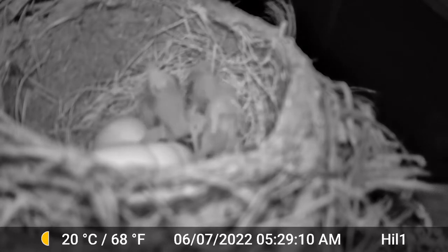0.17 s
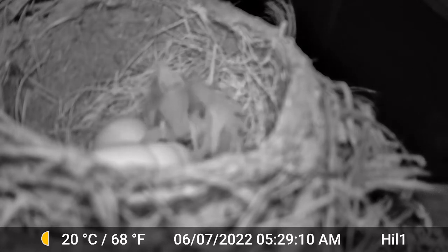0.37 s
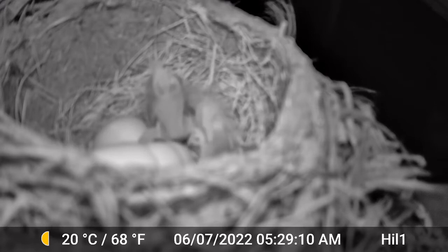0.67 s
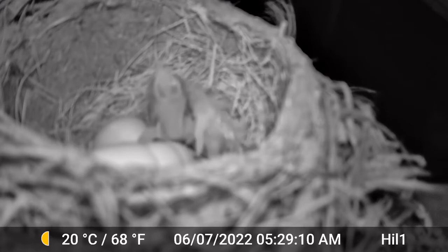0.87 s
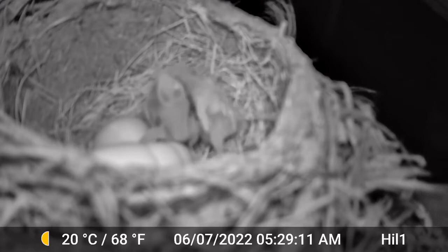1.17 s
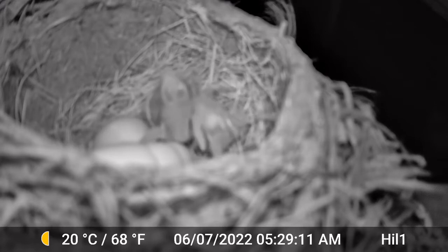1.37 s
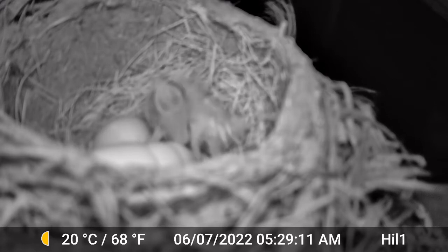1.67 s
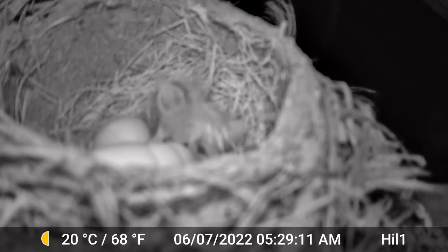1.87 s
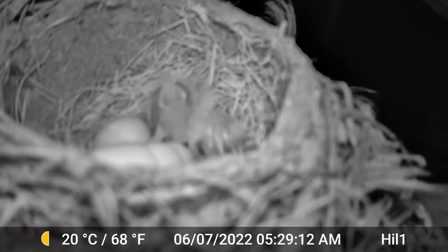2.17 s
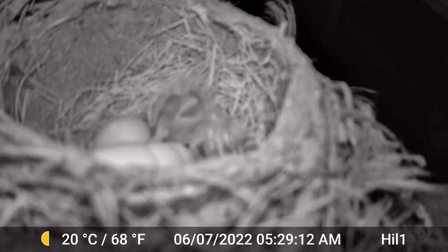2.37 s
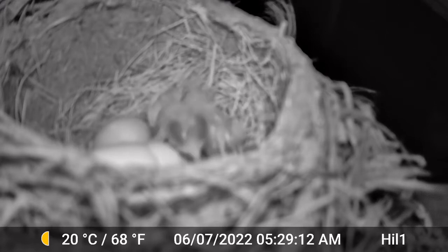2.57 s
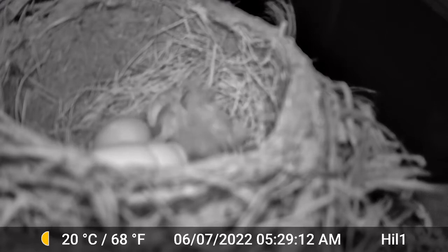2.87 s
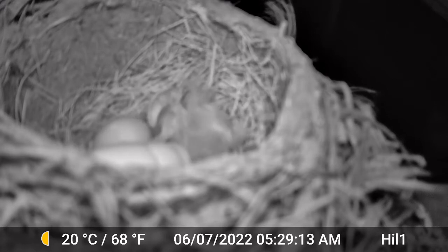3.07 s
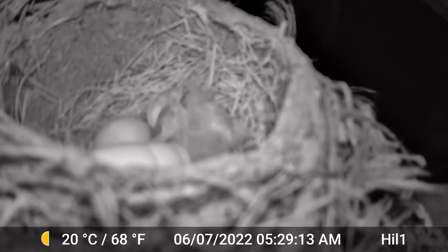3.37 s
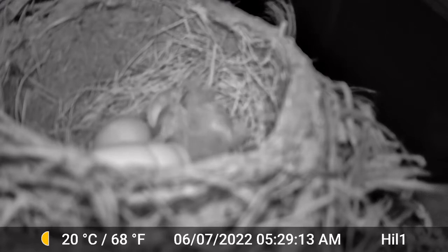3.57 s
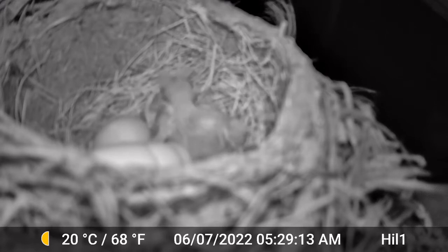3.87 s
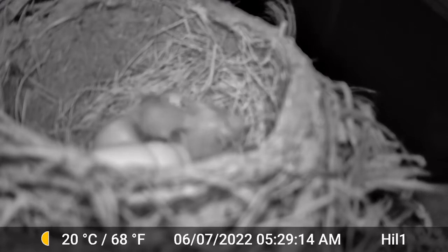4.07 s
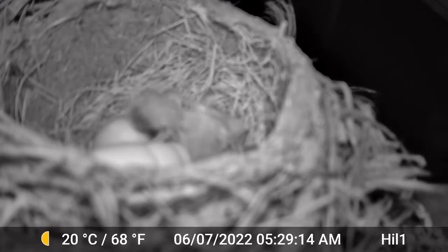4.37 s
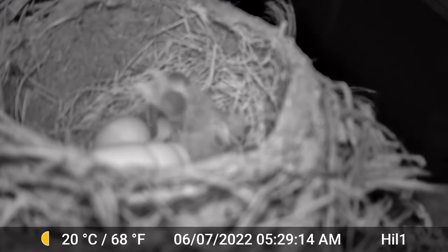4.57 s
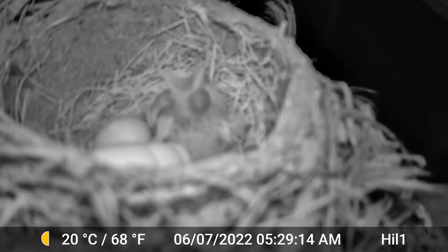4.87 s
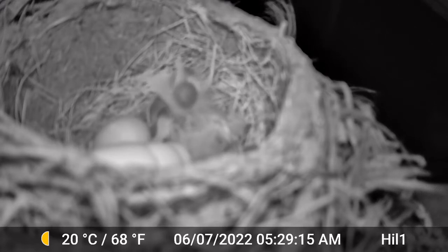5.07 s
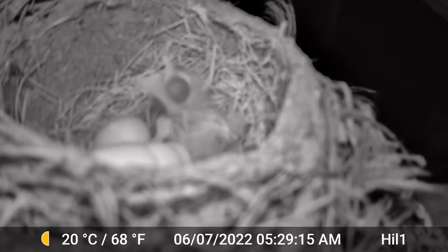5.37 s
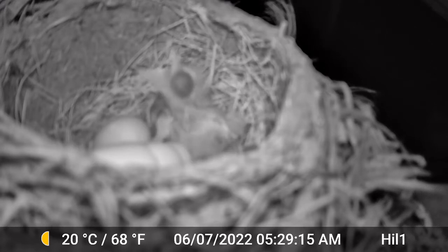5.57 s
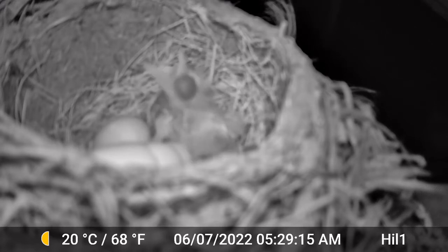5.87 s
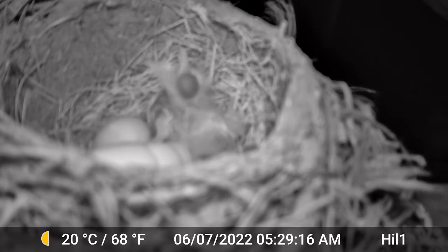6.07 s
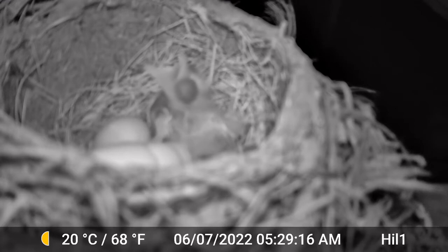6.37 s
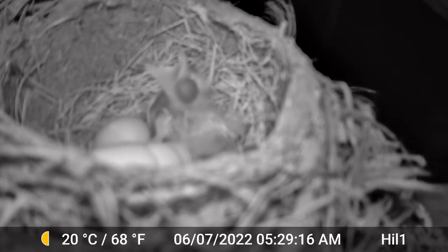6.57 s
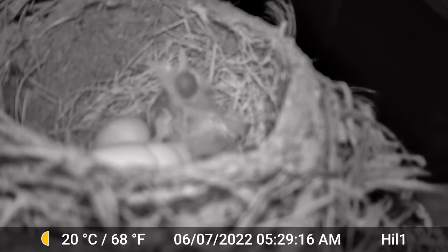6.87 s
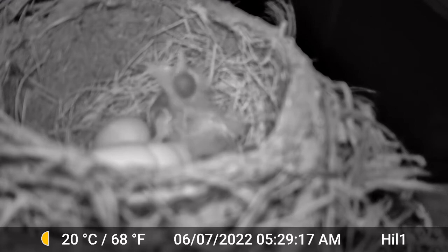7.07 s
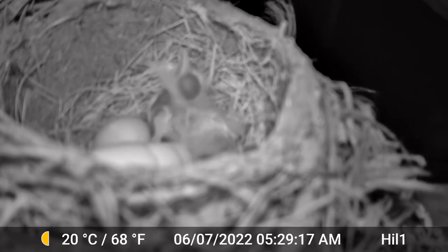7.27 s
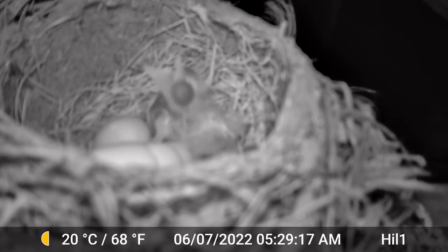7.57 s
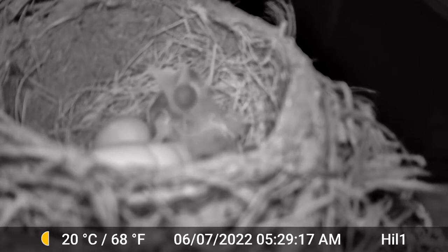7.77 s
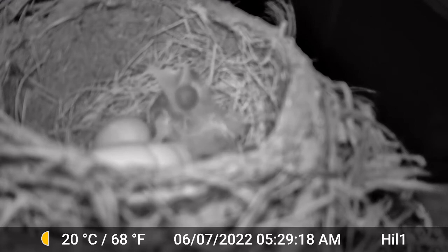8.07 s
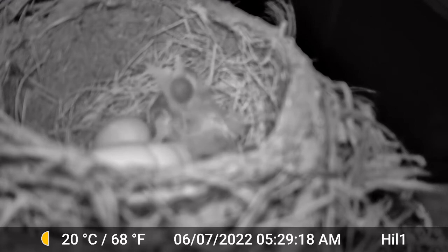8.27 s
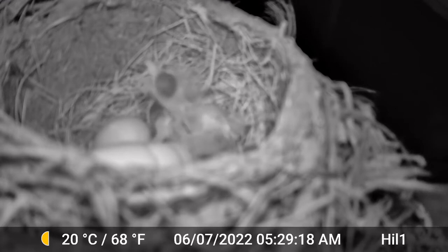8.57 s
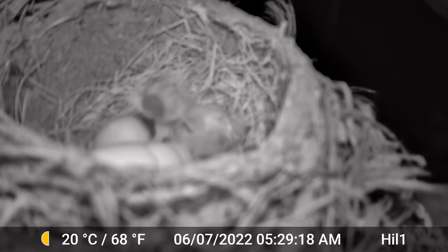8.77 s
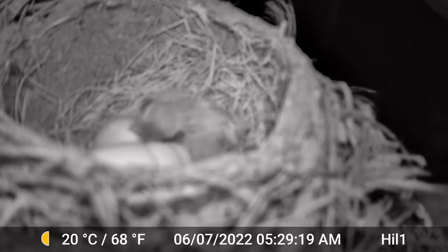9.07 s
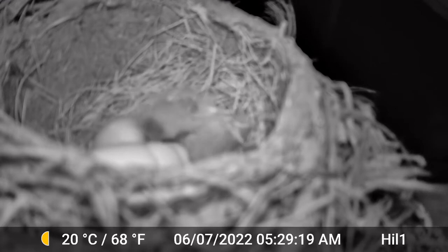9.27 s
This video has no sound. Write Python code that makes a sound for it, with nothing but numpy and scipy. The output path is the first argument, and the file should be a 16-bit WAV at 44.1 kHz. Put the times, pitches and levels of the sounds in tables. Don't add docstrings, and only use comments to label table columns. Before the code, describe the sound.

Dawn at a nest: distant rumbling traffic, faint far-off bird chorus, echoing clear songbird whistles, and a chick's few brief dry peeps close up.

```python
import sys
import numpy as np
from scipy import signal
from scipy.fft import rfft, irfft
from scipy.io import wavfile
from scipy.ndimage import uniform_filter1d, map_coordinates

SR = 44100
rng = np.random.default_rng(int(sys.argv[2]) if len(sys.argv) > 2 else 0)


def materialize(psi):
    bounded = np.clip(np.atleast_2d(psi).T, -1, 1)
    quanta = np.round(bounded * 32767).astype(np.int16)
    wavfile.write(sys.argv[1], SR, quanta)


def voltage_ratio(level):
    return 10 ** (np.asarray(level, float) / 20)


N = 415422


def unit(x):
    return x / np.sqrt(np.mean(x ** 2) + 1e-20)


def along(points, hz):
    f, v = np.transpose(points)
    return np.interp(np.log(hz + 1), np.log(f + 1), v)


def curves(rows):
    s, *cols = np.transpose(rows)
    return [np.interp(np.arange(N) / SR, s, c) for c in cols]


def wobble(rate, n=N):
    knots = rng.standard_normal(int(n * 1000 / SR) + 4)
    return map_coordinates(knots, [np.arange(n) * min(rate, 1000) / SR])


def background():
    # start_s, road_roar_db, chorus_db
    air = [(0.0, -36, -57), (1.84, -36, -60.5), (2.2, -35.5, -60), (4.43, -36, -57), (4.69, -36, -58.5),
           (5.3, -37.5, -61.5), (5.75, -37.5, -62.5), (6.1, -37.5, -57), (6.45, -36, -62.5),
           (6.9, -35.5, -64), (7.4, -35, -57.5), (7.9, -35, -62), (8.4, -35.5, -60.5), (8.8, -35.5, -62),
           (9.42, -34.5, -58)]
    # pitch_hz, level_db (per Hz)
    low = [(18, -40), (30, -19.5), (50, -8.5), (75, -7), (91, 1), (105, -9), (140, -11), (200, -41)]
    road = [(65, -31.5), (110, -5.5), (176, -3), (221, -13.5), (260, -12), (358, -20), (420, -15.5),
            (528, -21.5), (627, -18), (1130, -29.5), (1700, -47), (2210, -73), (3740, -120)]
    bird_blur = [(1500, -37), (2000, -13), (2400, -1), (3000, 0), (3400, -5), (3800, -4.5), (4300, -15),
                 (5500, -35.5)]
    mic_noise = [(900, -28), (1500, 2.5), (4000, -6), (7000, -7), (8000, -16), (8700, -30.5), (9100, -61)]
    roar_db, chorus_db = curves(air)
    unsteady = voltage_ratio(1.3 * wobble(8.3)) * rush(low, patchy_db=0.5, size=4096)
    rumble = voltage_ratio(lumps()) * unit(unsteady)
    roar = voltage_ratio(roar_db + 1.1 * wobble(5)) * rush(road, patchy_db=1.95, size=2048)
    chorus = voltage_ratio(chorus_db) * rush(bird_blur, patchy_db=3, size=1024)
    hiss = voltage_ratio(-67) * rush(mic_noise, patchy_db=.2, size=512)
    return rumble + roar + chorus + hiss


def lumps():
    # middle_s, level_db (over the steady rumble)
    rumble_lumps = [(.05, 8.5), (2.53, 11.5), (4.25, 7.5), (4.4, 11), (4.88, 10.5), (5.41, 4.5),
                    (5.87, 1.5), (6.01, 8), (6.42, 2.5), (6.68, 10.5), (1.03, 8.5), (7.62, 3.5), (8.32, 5),
                    (9.02, 12), (9.21, 7.5)]
    steady_db, half_width_s, lull_db = -33, 0.034, -4.5
    t = np.arange(N) / SR

    def bell(s, width):
        return np.exp(-((t - s) / width) ** 2)

    level = np.full(N, float(steady_db))
    for s, db in rumble_lumps:
        level += (db - lull_db) * bell(s, half_width_s)
        level += lull_db * bell(s, 3 * half_width_s)
    return level


def rush(spectrum, patchy_db, size):
    z = signal.stft(rng.standard_normal(N + 8192), nperseg=size)[2]
    field = uniform_filter1d(rng.standard_normal(z.shape), size=3, axis=0)
    field = uniform_filter1d(field, size=16, axis=1)
    patchy = signal.istft(z * voltage_ratio(patchy_db * unit(field)), nperseg=size)[1]
    x = rfft(patchy)
    hz = np.linspace(0, SR / 2, len(x))
    inside = (hz > spectrum[0][0]) & (hz < spectrum[-1][0])
    return unit(irfft(x * voltage_ratio(along(spectrum, hz)) * inside)[:N])


def straw():
    # start_s, peak_db, ring_hz
    ticks = [(0.1262, -50, 6720), (0.1478, -41, 5590), (1.1998, -44, 7050), (3.5545, -47.5, 5390),
             (4.012, -41, 5700), (4.145, -34, 6030), (4.6794, -56, 4580), (9.1252, -54, 6900)]
    out, t = np.zeros(N + SR), np.arange(SR // 25) / SR
    for s, db, hz in ticks:
        snaps = rng.standard_normal(len(t)) * voltage_ratio(-60 * t / .04)
        swell = voltage_ratio(-60 * t / 0.0039) * (1 - np.exp(-t / .0004))
        ring = np.sin(2 * np.pi * hz * t) * swell
        tick = signal.fftconvolve(snaps, ring)[:len(t)]
        out[round(s * SR):][:len(t)] += voltage_ratio(db) * tick / np.abs(tick).max()
    return out[:N]


def far_birds():
    # start_s, length_s, from_hz, to_hz, level_db
    far_glides = [(.18, 0.2, 3264, 3233, -53), (.46, 0.1, 2750, 2535, -56), (.52, 0.06, 3160, 3100, -61),
                  (.96, 0.16, 3530, 3550, -53.5), (2.2, 0.068, 3300, 3800, -53),
                  (2.32, 0.044, 2990, 3380, -42.5), (2.475, 0.14, 3055, 3430, -47.5),
                  (2.74, 0.077, 2560, 2560, -54), (5.35, 0.18, 2155, 2020, -60.5),
                  (5.42, 0.13, 3195, 3090, -54), (5.53, 0.081, 2330, 2020, -51),
                  (6.04, 0.15, 2900, 2460, -57), (6.5, 0.14, 2526, 2620, -56),
                  (6.572, .07, 3140, 3000, -50), (6.995, 0.19, 3500, 3530, -49),
                  (7.115, 0.043, 2255, 2000, -48), (7.575, 0.053, 2950, 2610, -45),
                  (7.69, 0.11, 2920, 3020, -53), (8.63, 0.083, 2105, 1996, -61), (9.1, .1, 3330, 2980, -49),
                  (9.28, 0.1, 3170, 3640, -59.5),
                  (.33, 0.058, 2390, 2300, -59), (0.408, .05, 2400, 2340, -60),
                    (0.562, 0.099, 3040, 2960, -61), (4.55, .1, 2270, 2160, -59),
                    (7.02, 0.075, 3300, 2900, -55), (7.63, .045, 1960, 1900, -63),
                    (7.75, 0.1, 3440, 3600, -63), (8.608, .12, 3110, 3060, -66),
                    (8.728, 0.074, 2210, 2190, -59.5), (9.18, .06, 2490, 2210, -59),
                    (2.6, 0.038, 3320, 3300, -52.5)]
    # start_s, length_s, edge_hz, turning_hz, level_db
    far_turns = [(2.8, 0.17, 2935, 3210, -47), (4.425, 0.068, 4620, 4690, -54.5),
                 (4.57, 0.086, 4450, 4600, -57), (6.0, .05, 3170, 3610, -57),
                 (6.97, 0.051, 2420, 2260, -58), (7.5, 0.054, 3250, 3580, -50.5),
                 (8.835, 0.093, 2640, 2930, -42), (2.55, 0.078, 2180, 2184, -56),
                 (6.64, 0.082, 3010, 3020, -58), (3.3, 0.17, 3250, 3270, -48.5),
                 (8.72, 0.086, 2660, 2640, -62), (9.04, 0.1, 3400, 3345, -48.5)]
    buzzes = [
        (5.98, .11, 4700, 4250, -63),
        (8.35, .4, 4680, 4390, -74),
    ]
    # time_s, pitch_hz, level_db
    hook = [(8.178, 3500, -60), (8.192, 2810, -44), (8.225, 2390, -42), (8.26, 2280, -50),
            (8.288, 2325, -47), (8.305, 2940, -39)]
    # start_s, length_s, from_hz, to_hz, level_db
    strokes = [
        (8.32, .024, 2300, 2930, -44.5),
        (8.342, .027, 2910, 2950, -50),
        (6.935, 0.037, 3000, 2450, -60),
        (8.965, .035, 3250, 3560, -46),
        (9.0, .03, 3560, 3400, -46.5),
        (9.025, .075, 3350, 2600, -45),
    ]
    far_notes = plain(far_glides) + plain(far_turns, turning=True)
    calls = whistles(far_notes, octave_db=-60, edge_s=.008, waver=.01, flutter_db=4.5)
    calls = calls + whistles([hook, *plain(strokes)], octave_db=-60, edge_s=.008, waver=.006, flutter_db=2.5)
    calls = calls + whistles(plain(buzzes, turning=True), octave_db=-60, edge_s=.02, waver=.04, flutter_db=4)
    return heard(calls, direct_db=-2.5, near_db=-5.5, reach_s=.07, far_db=-10, stretch=.9, treble_db=-3)


def plain(rows, turning=False):
    start_db, end_db, attack, release = -1.5, -7, 0.47, 0.32
    u = np.linspace(0, 1, 9)
    shape = 4 * u * (1 - u) if turning else u
    swell = start_db * np.clip(1 - u / attack, 0, 1)
    swell = swell + end_db * np.clip(1 - (1 - u) / release, 0, 1)
    return [np.transpose([s + length * u, a + (b - a) * shape, db + swell]) for s, length, a, b, db in rows]


def whistles(notes, octave_db, edge_s, waver, flutter_db, rasp=0):
    out = np.zeros(N + SR)
    for note in notes:
        s, hz, db, *own = np.transpose(note)
        t = np.arange(s[0] - edge_s, s[-1] + edge_s, 1 / SR)

        def smooth(v):
            return uniform_filter1d(np.interp(t, s, v), size=220)

        pitch = smooth(hz) * (1 + warble(t) + waver * wobble(150, len(t)))
        phase = 2 * np.pi * np.cumsum(pitch) / SR
        gate = np.clip(np.minimum(t - t[0], t[-1] - t) / (2 * edge_s), 0, 1) ** 2
        flutter = flutter_db * wobble(70, len(t))
        upper_db = smooth(own[0]) if own else smooth(db) + octave_db
        tone = voltage_ratio(smooth(db) + flutter) * np.sin(phase)
        rough_phase = 2 * phase + rasp * wobble(250, len(t))
        octave = voltage_ratio(upper_db + 2.5 * flutter) * np.sin(rough_phase)
        out[round(t[0] * SR):][:len(t)] += np.sqrt(2) * gate * (tone + octave)
    return out[:N]


def warble(t):
    # start_s, end_s, swing (share of the pitch), turns_per_s
    trills = [(0.864, .965, 0.056, 108), (4.15, 4.256, 0.067, 102), (4.42, 4.483, 0.053, 110),
              (4.57, 4.64, 0.052, 82), (2.78, 2.97, 0.065, 55), (8.99, 9.3, 0.029, 130),
              (5.99, 6.17, 0.04, 63), (5.42, 5.49, 0.043, 83)]
    swings = np.zeros(len(t))
    for a, b, swing, rate in trills:
        fade = np.clip(np.minimum(t - a, b - t) / 0.014, 0, 1)
        swings += swing * fade * np.sin(2 * np.pi * rate * (t - a))
    return swings


def heard(x, direct_db, near_db, reach_s, far_db, stretch, treble_db, dull_hz=4500, sent=None):
    sent = x if sent is None else sent
    near = walls(sent, reach_s, fall_db=-13, clump_db=3, dull_hz=dull_hz)
    far = yard(sent, gap_s=.03, stretch=stretch, treble_db=treble_db)
    return voltage_ratio(direct_db) * x + voltage_ratio(near_db) * near + voltage_ratio(far_db) * far


def walls(x, reach_s, fall_db, clump_db, dull_hz):
    t = np.arange(round(0.7 * reach_s * SR)) / SR / reach_s
    clumps = clump_db * wobble(156, SR // 4)[:len(t)]
    ending = np.clip((1.3 - t) / 0.23, 0, 1) * (t > .02)
    echoes = rng.standard_normal(SR // 4)[:len(t)] * voltage_ratio(fall_db * t + clumps) * ending
    dull = signal.butter(2, dull_hz, fs=SR, output="sos")
    echoes = signal.sosfilt(dull, echoes / np.linalg.norm(echoes))
    return signal.oaconvolve(x, echoes)[:N]


def yard(x, gap_s, stretch, treble_db):
    # pitch_hz, fade_s (time to fall 60 dB)
    yard_fade = [(1800, 0.55), (3000, 0.49), (4200, 0.76), (5500, 1), (8000, 0.35)]
    hz, t, z = signal.stft(rng.standard_normal(SR * 3 // 4), SR, nperseg=256)
    fade_s = stretch * along(yard_fade, hz)[:, None]
    tail = signal.istft(z * voltage_ratio(-60 * t / fade_s), SR, nperseg=256)[1]
    tail = tail * voltage_ratio(4 * wobble(35, len(tail)))
    tail = np.pad(tail / np.linalg.norm(tail), (round(gap_s * SR), 0))
    colour = voltage_ratio(along([(4000, 0), (5000, treble_db)], np.fft.rfftfreq(len(tail), 1 / SR)))
    return signal.oaconvolve(x, irfft(rfft(tail) * colour, len(tail)))[:N]


def nestling():
    # time_s, pitch_hz, level_db
    cheep = [(.705, 2590, -62), (.717, 2750, -44.5), (.73, 2760, -40), (.748, 2660, -56), (.768, 2430, -55)]
    # time_s, pitch_hz, tone_db, octave_db
    gape = [(1.708, 2864, -49, -62), (1.718, 3085, -36, -44), (1.734, 3330, -30.5, -36.5),
            (1.748, 3330, -29, -33.5), (1.766, 3050, -30, -35), (1.774, 2880, -30.5, -38.5),
            (1.784, 2475, -40, -34), (1.79, 2330, -47, -46)]
    voice = whistles([cheep, gape] + peeps(), octave_db=0, edge_s=.0016, waver=.001, flutter_db=.5, rasp=.1)
    return heard(voice, direct_db=-.5, near_db=-14, reach_s=.02, far_db=-21, stretch=.7, treble_db=-10,
                 dull_hz=8000)


def peeps():
    # start_s, length_s, top_hz, peak_db, octave_peak_db
    peep_rows = [
        (4.318, 0.06, 3300, -33, -40),
        (5.793, 0.073, 3430, -23, -35.5),
        (7.38, 0.079, 3445, -23, -34),
        (8.823, 0.094, 3436, -22, -34),
    ]
    # share (of the length), tone_db, octave_db (relative to their peaks)
    arch = [(0, -15, -21.5), (.06, -11, -17), (.25, -11.5, -15), (.42, -12.5, -12), (.62, -5.5, -7.5),
            (.83, 0.5, 1), (.93, -5.5, -7), (1, -17, -15)]
    crest, rise, fall, squareness = 0.4, .16, 0.34, 2.5
    u = np.linspace(0, 1, 33)
    share, tone, upper = np.transpose(arch)
    before = rise * np.abs(1 - u / crest) ** squareness
    after = fall * np.abs((u - crest) / (1 - crest)) ** squareness
    bow = 1 - np.where(u < crest, before, after)
    notes = []
    for s, length, top, db, octave_db in peep_rows:
        tone_db = db + np.interp(u, share, tone)
        upper_db = octave_db + np.interp(u, share, upper)
        notes.append(np.transpose([s + u * length, top * bow, tone_db, upper_db]))
    return notes


def songbird():
    echo_db = [-1, 1, -6, -2.5, 0.5, -1.5, -0.5, 2.5, 1.5, -0.5, 1, 0, -6, -0.5, 0.5]
    # start_s, length_s, from_hz, to_hz, level_db
    twitter = [(2.275, .016, 6800, 5300, -39), (2.289, 0.016, 5350, 3430, -34),
               (2.5, .005, 8300, 7300, -52), (2.316, 0.017, 4800, 8700, -43.5),
               (2.343, .016, 9020, 6800, -51.5), (2.356, .008, 7500, 6940, -44.5),
               (2.352, .03, 4450, 3710, -34.5), (2.385, 0.047, 3720, 3750, -48.5),
               (2.383, 0.0079, 6750, 8200, -36.5), (2.403, 0.011, 8500, 7160, -52),
               (2.42, 0.011, 7300, 8400, -48), (2.44, .04, 7600, 7150, -59),
               (2.477, 0.13, 7300, 7560, -50.5), (2.535, .07, 6620, 6700, -61),
               (2.46, .06, 5900, 6450, -66.5), (2.5, 0.13, 8600, 8550, -64.5)]
    notes = syllables()
    song = whistles(notes, octave_db=0, edge_s=.003, waver=.003, flutter_db=1.3, rasp=.95)
    ends_s = np.ravel([note[[0, -1], 0] for note in notes])
    sent_db = curves(np.transpose([ends_s, np.repeat(echo_db, repeats=2)]))[0]
    tune = heard(song, direct_db=-2, near_db=-4.5, reach_s=.19, far_db=-8, stretch=1.2, treble_db=-11,
                 dull_hz=4000, sent=song * voltage_ratio(sent_db))
    high = whistles(plain(twitter), octave_db=-70, edge_s=.003, waver=.007, flutter_db=3)
    return tune + heard(high, direct_db=-1.5, near_db=2.5, reach_s=.09, far_db=-3, stretch=0.9, treble_db=-5.0)


def syllables():
    # time_s, pitch_hz, level_db
    opening = [
        [(.8, 2020, -61), (.815, 2370, -36), (.87, 2497, -24), (.93, 2650, -33), (.955, 2518, -32),
         (.97, 2280, -36.5), (1.01, 2077, -32.5), (1.075, 1970, -44)],
        [(1.272, 3020, -43), (1.295, 3390, -29.5), (1.31, 3590, -22), (1.318, 3070, -27), (1.335, 2734, -21.5),
         (1.36, 2420, -23), (1.368, 2787, -23.5), (1.38, 3000, -22), (1.39, 2920, -20)],
        [(1.395, 2140, -53.5), (1.405, 1820, -47.5), (1.435, 1804, -43.5), (1.447, 2300, -38.5),
         (1.48, 2310, -26.5), (1.5, 2390, -37)],
        [(1.49, 2840, -28), (1.52, 2845, -20.5), (1.56, 2842, -21.5), (1.6, 2766, -51)],
    ]
    answer = [
        [(1.818, 2997, -52), (1.83, 3520, -27.5), (1.836, 2827, -27.5), (1.88, 2617, -23.5),
         (1.89, 3215, -17.5), (1.9, 2537, -29.5), (1.915, 2500, -23.5), (1.932, 2050, -33)],
        [(1.95, 2160, -41), (1.995, 2443, -27), (2.01, 2110, -35), (2.035, 1980, -46.5)],
        [(2.988, 2980, -35.5), (3.01, 3063, -20), (3.035, 3083, -18.5), (3.05, 2944, -29.5)],
        [(3.056, 4180, -40), (3.066, 3610, -21), (3.08, 3210, -21.5), (3.095, 3090, -20)],
        [(3.095, 2360, -38), (3.105, 1730, -53), (3.14, 1930, -39.5), (3.17, 2103, -29.5), (3.2, 2378, -27),
         (3.24, 2316, -33)],
    ]
    peak = [
        [(3.532, 3130, -42), (3.55, 3320, -24)],
        [(3.555, 2290, -32), (3.56, 3180, -21), (3.566, 3677, -25), (3.59, 3680, -24), (3.615, 3497, -28),
         (3.626, 3070, -24), (3.64, 2646, -23), (3.665, 2500, -21), (3.68, 2660, -46.5)],
        [(3.682, 2200, -46), (3.72, 2317, -27), (3.745, 2456, -23), (3.76, 2794, -23), (3.775, 2480, -36.5),
         (3.79, 2245, -33), (3.83, 2203, -33)],
        [(4.102, 2850, -35.5), (4.143, 2760, -20.5), (4.168, 3326, -17), (4.2, 3300, -19.5), (4.24, 3107, -21),
         (4.26, 2842, -25.5), (4.285, 2780, -18), (4.31, 2768, -15), (4.365, 2775, -17.5)],
    ]
    close = [
        [(7.135, 2930, -51), (7.15, 3016, -35), (7.165, 2770, -24), (7.19, 2716, -36), (7.205, 3245, -26.5),
         (7.218, 2670, -27.5), (7.235, 2210, -25.5)],
        [(7.285, 2214, -46), (7.3, 2515, -26.5), (7.315, 2503, -30), (7.335, 2050, -31.5)],
    ]
    # pitch_hz, octave_db (relative to the tone)
    throat = [(1800, -29), (2050, -21.5), (2250, -20.5), (2450, -33.5), (2850, -44), (3200, -35.5),
              (3600, -41.5)]
    beak_db = [4.5, 2.5, -6.5, -13, 3, -9, -3.5, 1.5, -7, -9.5, 1.5, 0.5, 5, -3, -7]
    fall_db, full_fall_hz_per_s = 4.5, 6800
    octave_grows = 0.29
    notes = []
    for note, facing_db in zip([*opening, *answer, *peak, *close], beak_db):
        s, hz, db = np.transpose(note)
        falling = np.clip(-np.gradient(hz, s) / full_fall_hz_per_s, 0, 1)
        effort_db = octave_grows * (db - db.max())
        upper_db = db + along(throat, hz) + fall_db * falling + effort_db + facing_db
        notes.append(np.transpose([s, hz, db, upper_db]))
    return notes


def scene():
    return (background() + straw() + far_birds() + nestling() + songbird())[None]


def low_pass(x):
    return signal.sosfilt(signal.butter(12, 8720, fs=SR, output="sos"), x)


def record(dry):
    roll = signal.butter(8, 8700, fs=SR, output="sos")
    eased = dry * signal.windows.tukey(N, .012 * SR / N)
    return low_pass(signal.sosfilt(roll, eased))


dry = scene()
out = record(dry)
materialize(out)
```